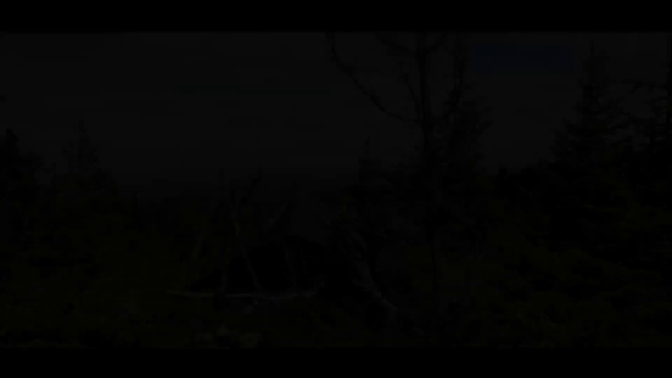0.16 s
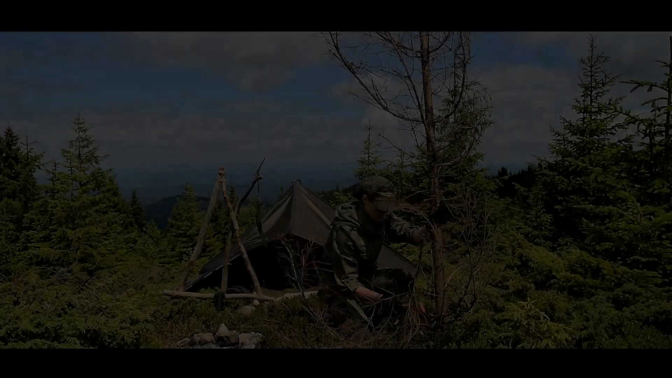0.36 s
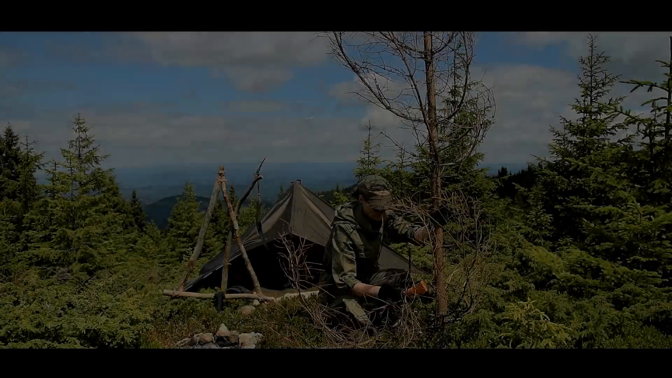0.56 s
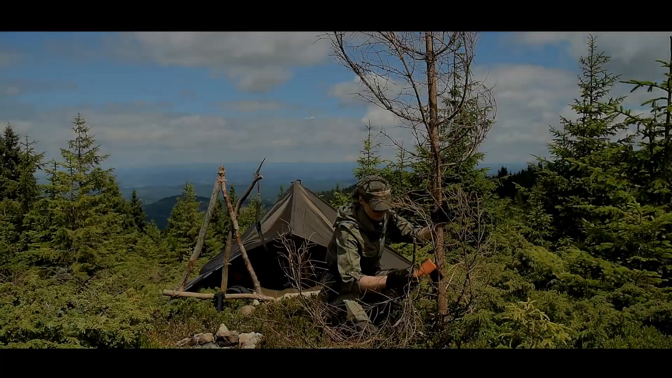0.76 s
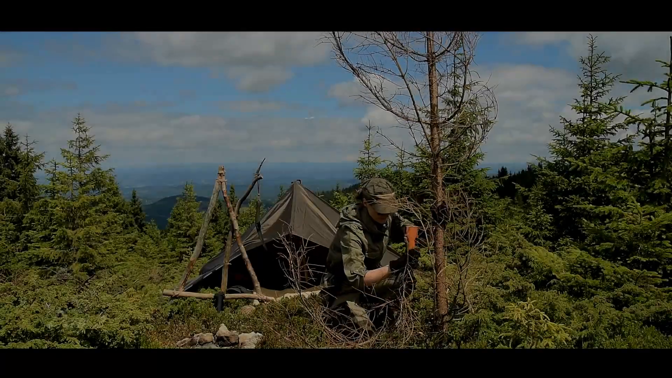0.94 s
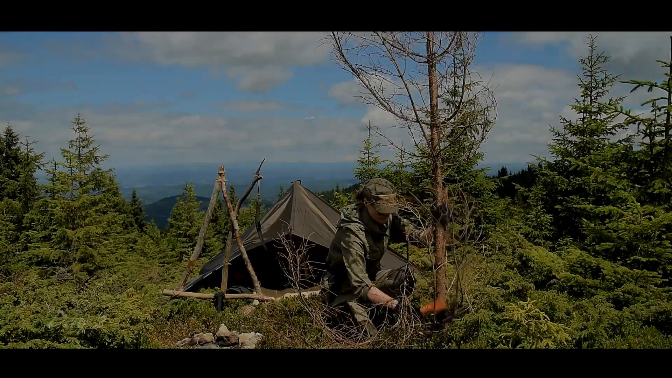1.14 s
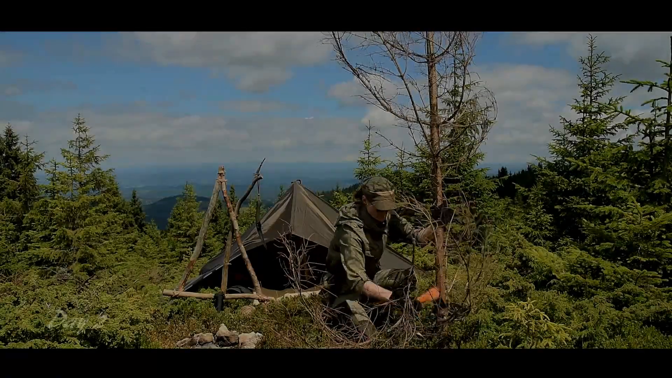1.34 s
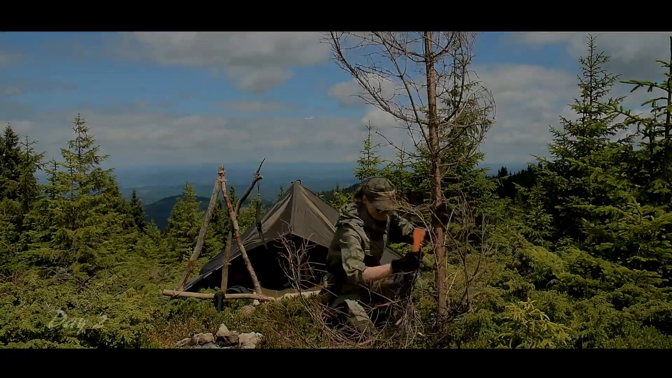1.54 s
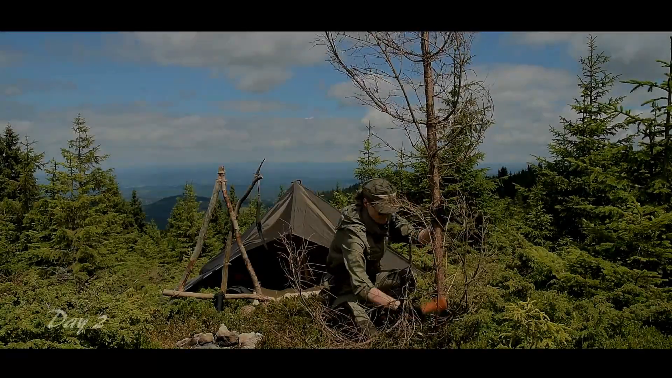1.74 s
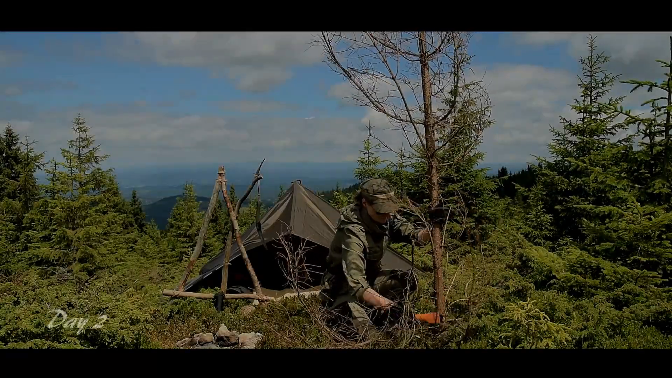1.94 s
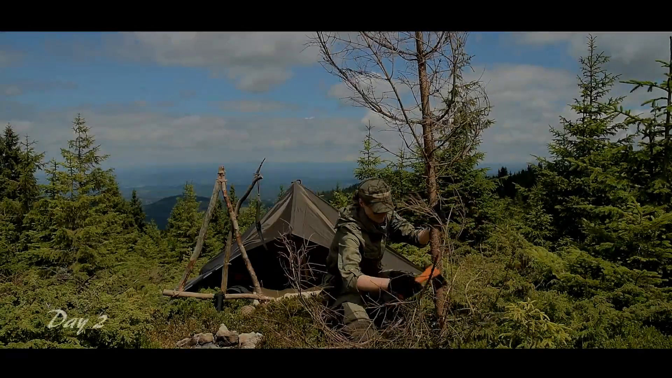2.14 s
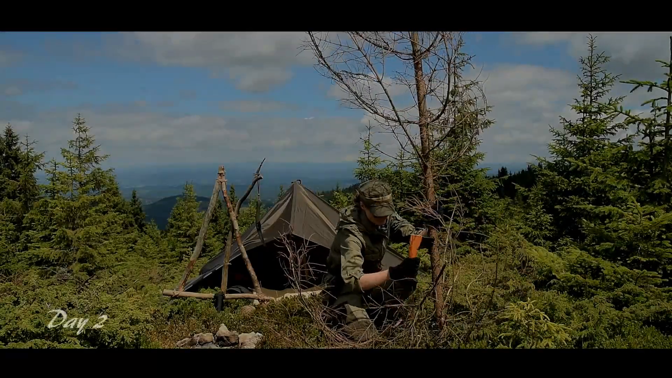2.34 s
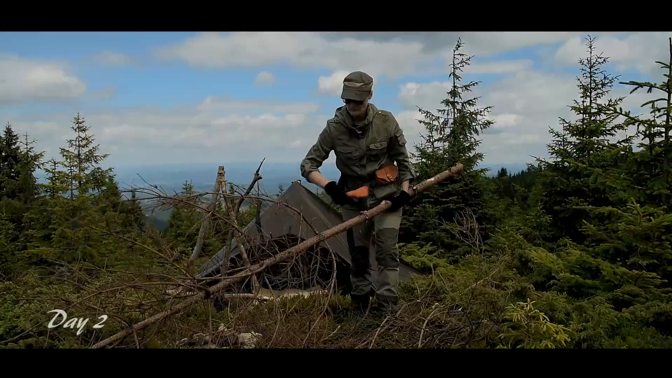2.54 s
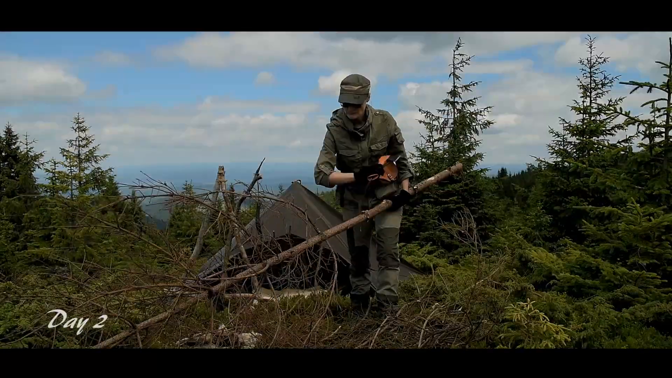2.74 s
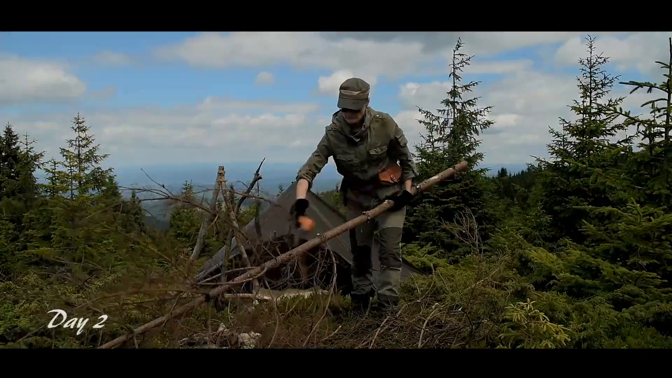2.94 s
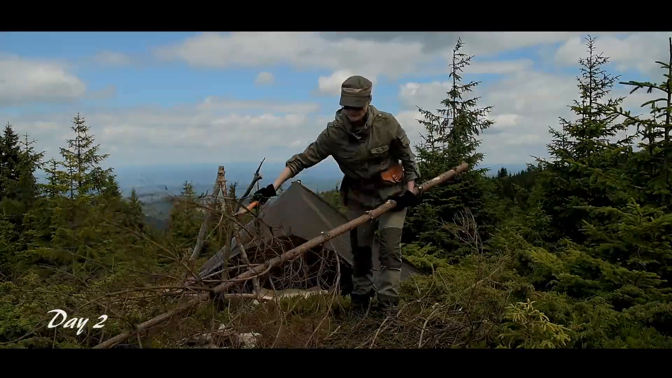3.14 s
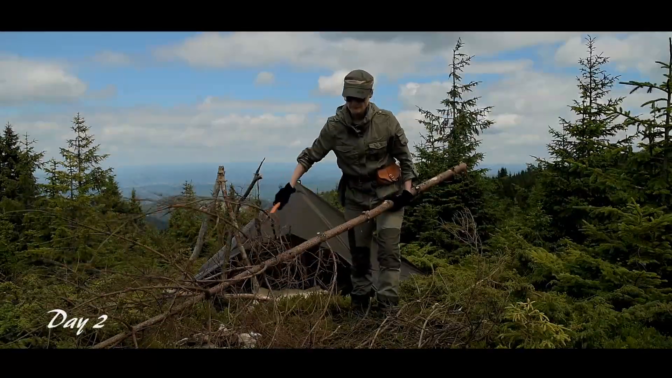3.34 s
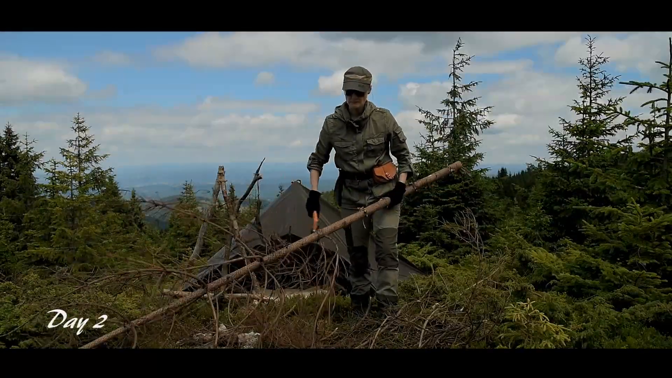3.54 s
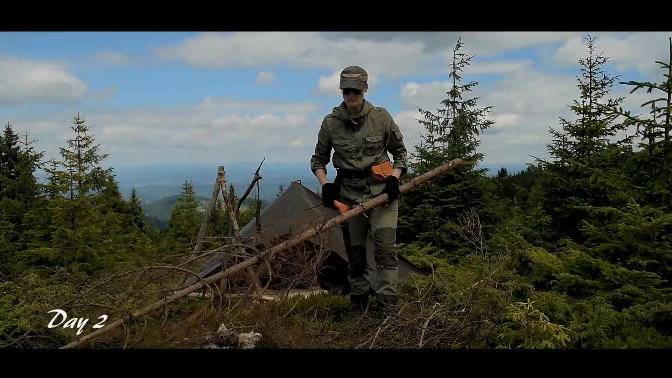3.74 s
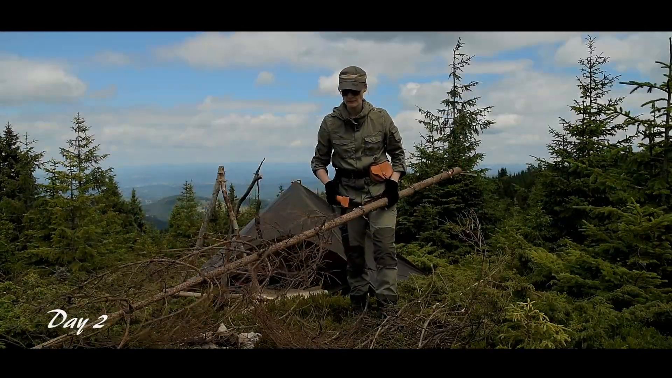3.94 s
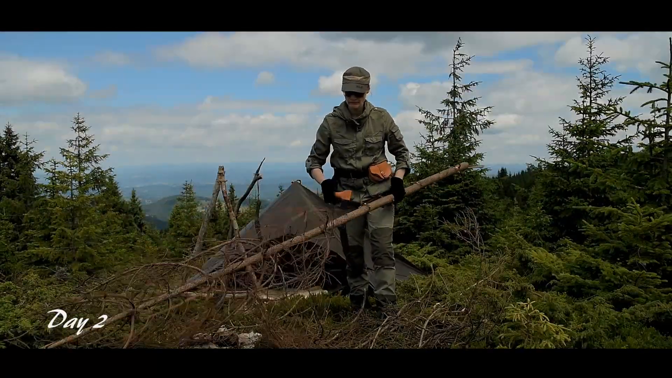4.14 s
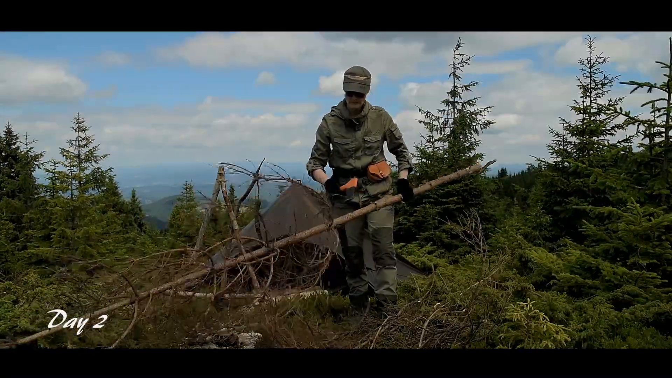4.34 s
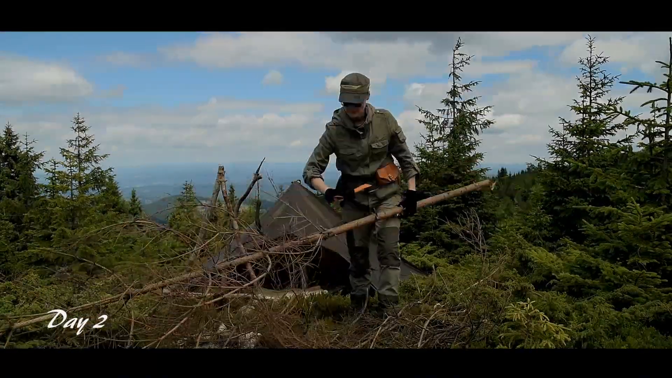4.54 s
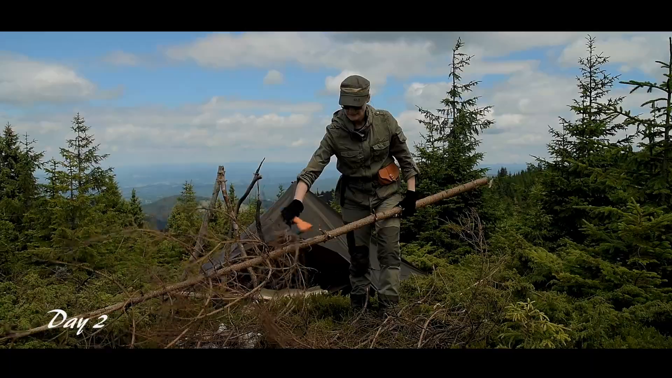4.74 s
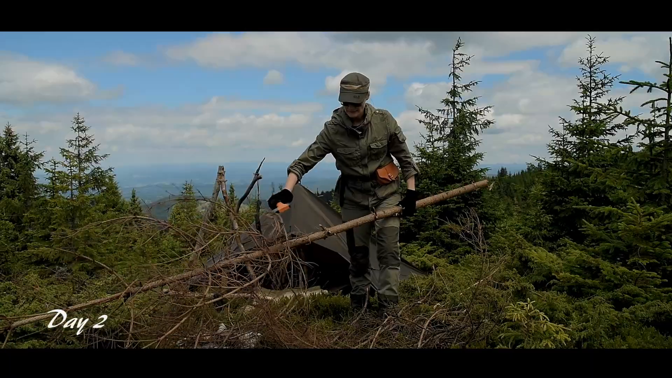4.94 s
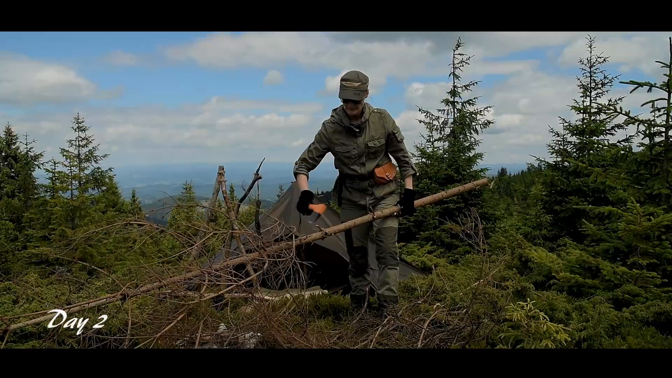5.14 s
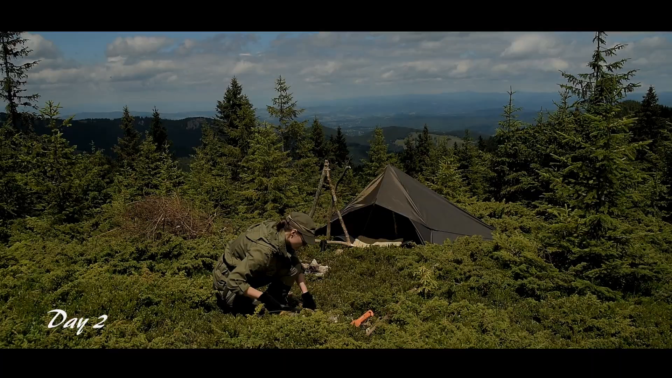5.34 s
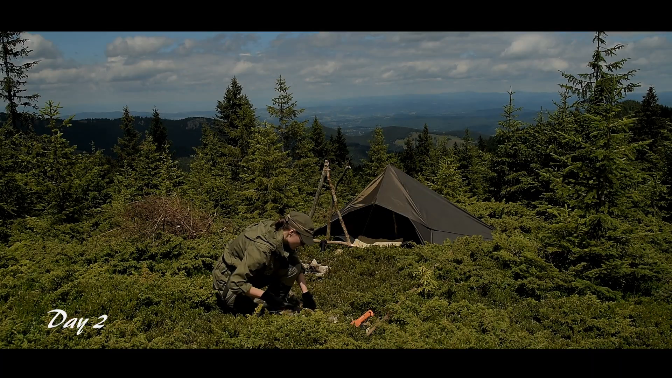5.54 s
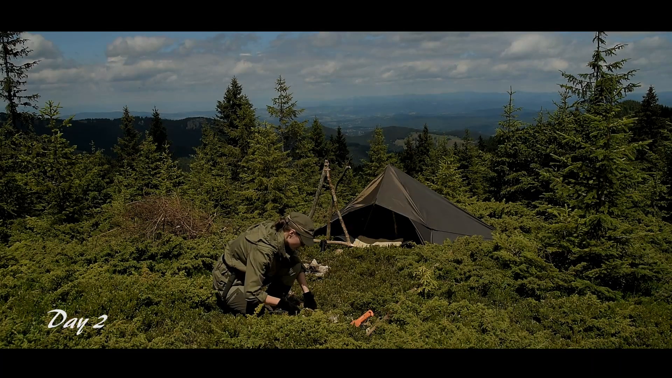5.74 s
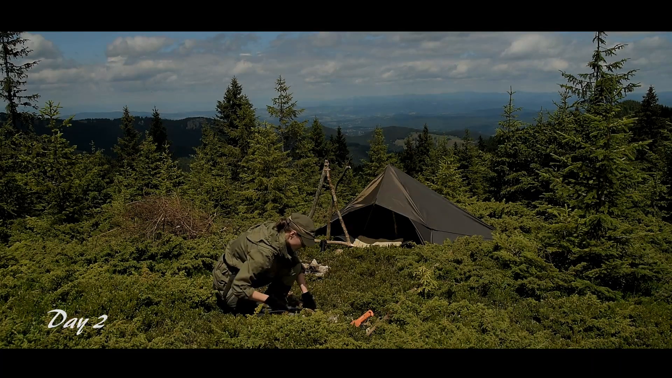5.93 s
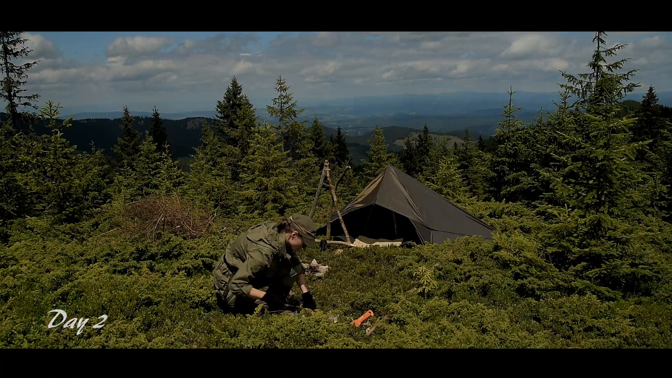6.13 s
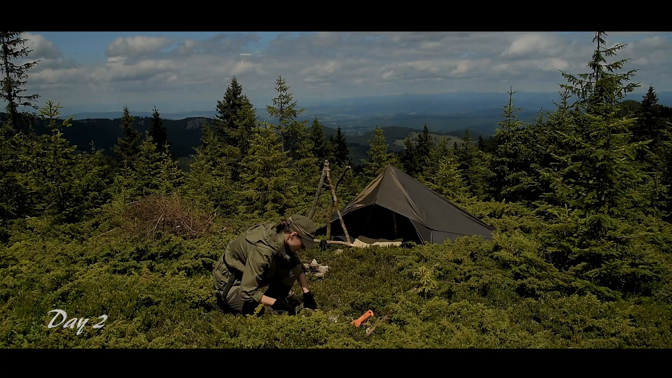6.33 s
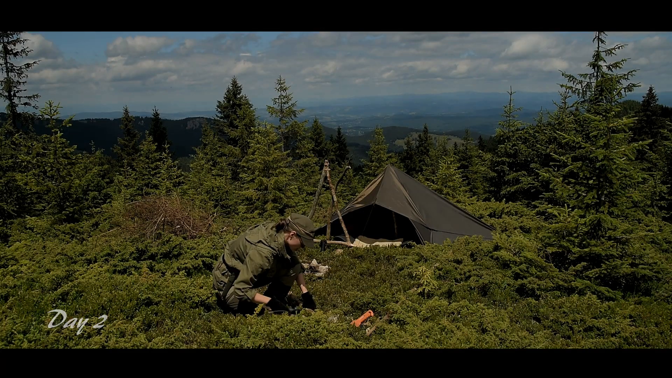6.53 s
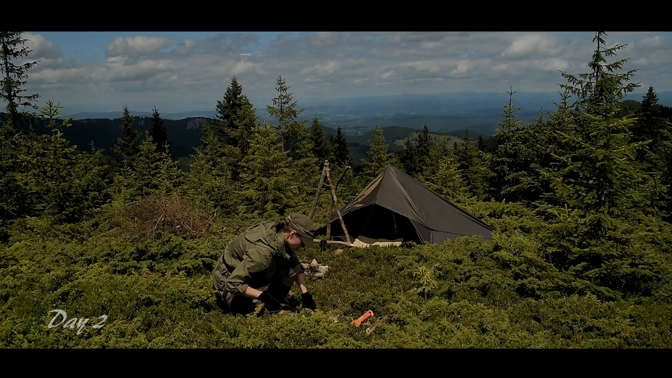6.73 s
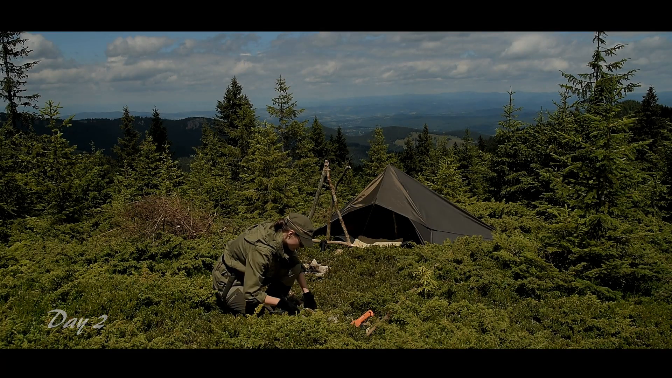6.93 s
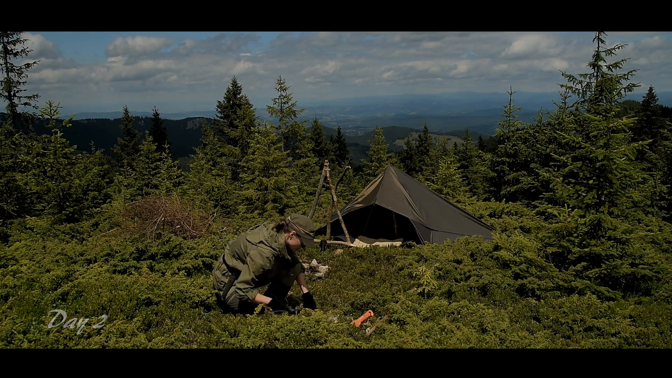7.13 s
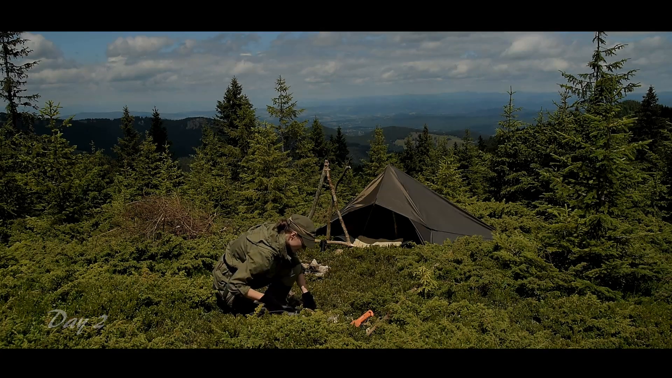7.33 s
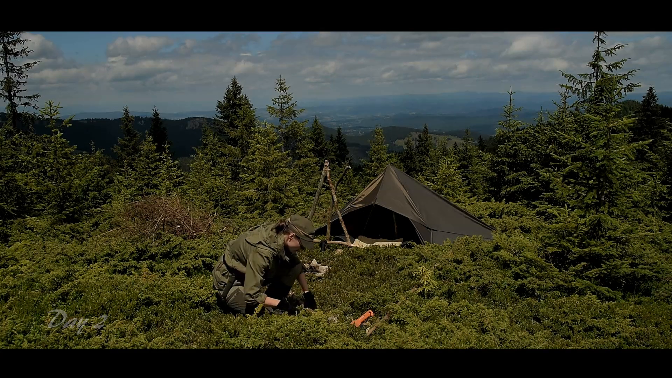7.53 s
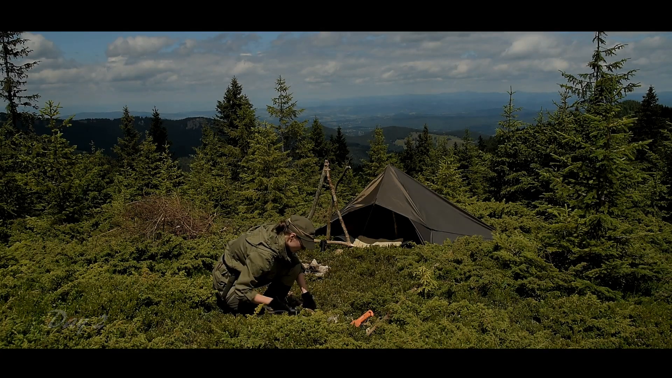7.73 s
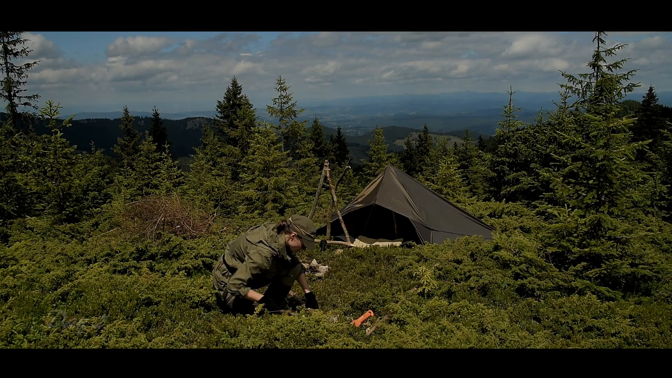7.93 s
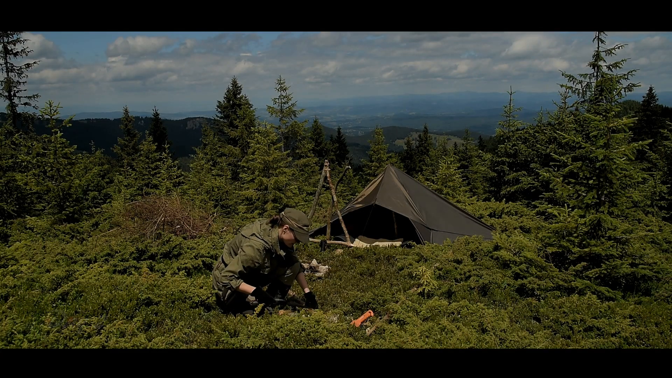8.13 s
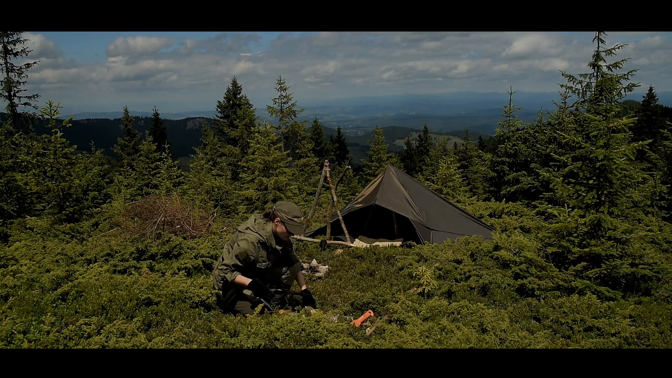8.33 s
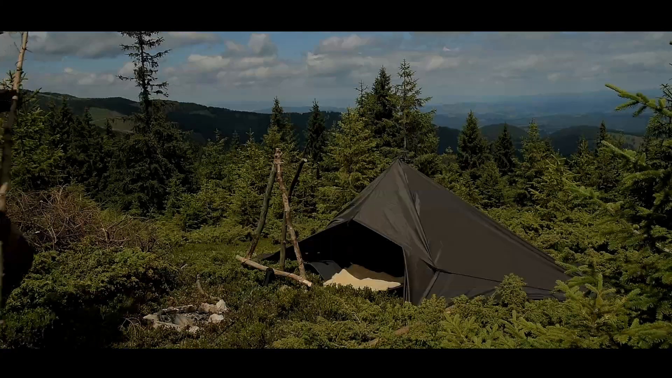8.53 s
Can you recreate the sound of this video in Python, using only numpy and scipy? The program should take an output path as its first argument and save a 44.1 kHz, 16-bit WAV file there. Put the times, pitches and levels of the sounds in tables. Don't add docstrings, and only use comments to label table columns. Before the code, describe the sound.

Dead branches are knocked off a dry spruce with harsh overloaded cracks and twig rustle, then a hand saw rasps quickly through a thin pole outdoors.

```python
import sys
import numpy as np
from scipy import signal
from scipy.fft import rfft, irfft, next_fast_len
from scipy.io import wavfile
from scipy.ndimage import uniform_filter1d

SR = 44100
rng = np.random.default_rng(int(sys.argv[2]) if len(sys.argv) > 2 else 0)


def inscribe(sig):
    pcm = np.round(np.clip(np.atleast_2d(sig).T, -1, 1) * 32767)
    wavfile.write(sys.argv[1], SR, pcm.astype(np.int16))


def voltage_ratio(decibels):
    exponent = np.asarray(decibels, float) / 20
    return 10 ** exponent


N = 382788

# frequency in Hz, level in dB per Hz.
AIR_COLOUR = [(59, -30), (100, -6.5), (279, 3), (471, -0.5), (694, 2), (1000, 0), (3470, -11),
              (6450, -21.5), (8460, -23.5), (9500, -24.5), (10300, -30), (13400, -45), (22000, -120)]
AIR_DB = -51
# frequency in Hz, likeness from 0 to 1.
AIR_LIKENESS = [(60, 0.84), (170, 0.84), (460, 0.77), (1280, 0.72), (3540, 0.12), (9820, 0.15)]
# time in seconds, level in dB.
WIND = [(0.0, -58), (0.39, -53.5), (0.6, -59.5), (1.67, -74), (1.91, -43.5), (2.08, -71), (2.47, -74),
        (2.78, -60), (3.6, -54.5), (4.25, -52.5), (4.57, -82), (4.83, -82), (6.94, -71), (7.64, -72),
        (8.34, -72), (8.68, -65)]

# frequency in Hz, level in dB per Hz.
TREE_TWIGS = [(88, -19), (150, -6), (182, -4), (426, -2), (545, 3.5), (724, -1.5), (1600, 0), (8160, -19.5),
              (10300, -27), (13400, -45), (22000, -120)]
POLE_TWIGS = [(88, -43), (150, -15.5), (674, 2), (805, 8), (1250, 6), (1660, 3), (2330, -0.5),
              (8610, -22.5), (9740, -28.5), (10300, -32), (13400, -48), (22000, -120)]
TENT_TWIGS = [(88, -68), (150, -37), (473, -9.5), (555, -5.5), (3820, -30.5), (5730, -26), (10300, -44.5),
              (13400, -51), (22000, -120)]
# time of the peak in seconds, build-up in seconds,
# peak in dB, settling time in seconds, brightness in dB.
TREE_SHAKES = [
    (.19, .12, -50, .01, -13.5),
    (.235, .01, -33, 0.16, -7.5),
    (.65, 0.08, -63.5, 1, -33),
    (.44, .015, -51, 0.022, -17),
    (1.255, .01, -31, 0.13, -6),
    (1.44, 0.014, -45, 0.023, -24),
    (1.925, 0.013, -36.5, 0.14, -6.5),
    (2.2, 0.045, -78, 0.72, 1),
]
POLE_SHAKES = [(2.484, .004, -47, 0.28, -15), (2.98, 0.04, -70, 0.011, -32), (3.045, .01, -32, 0.31, -8.5),
               (4.007, 0.0022, -51.5, 0.055, -4), (4.586, 0.0016, -39.5, 0.0082, -18),
               (4.62, 0.0088, -62.5, 0.11, -7), (4.75, 0.026, -46, .02, -16),
               (4.825, 0.014, -34, 0.28, -8.5), (5.23, 0.065, -68, 0.031, -3),
               (8.04, 0.0094, -38.5, 0.1, -6), (8.3, 0.078, -55.5, 0.82, -18)]
TENT_SHAKES = [
    (8.435, 0.0023, -48, 0.072, -6.5),
    (8.47, 0.031, -40.5, 0.43, -22.5),
]
STILL_S = (2.47, 5.33, 8.42)
# time in seconds, level in dB, brightness in dB.
DRAG = [(3.47, -62.5, -12.5), (3.55, -46, -9), (3.62, -40, -5.5), (3.78, -40, -5.5), (3.9, -42, -5.5),
        (4.08, -48, -17.5), (4.2, -41.5, -11), (4.37, -39.5, -8.5), (4.483, -45, -4.5), (4.539, -40, -17),
        (4.565, -70, 3)]

# frequency in Hz, level in dB per Hz.
SPLINTERS = [(59, -104), (100, -10), (765, 5), (1480, 3.5), (1980, 7), (2800, 1.5), (3820, -1), (5630, -6),
             (10300, -24), (13400, -58), (22000, -120)]
# time in seconds, ring peak in dB, ring frequency in Hz,
# time for the ring to fall 60 dB in seconds, splinter level in dB.
TREE_RUPTURES = [ (0.2092, 5, 1140, 0.0032, -12), (0.2121, 5, 3750, 0.0038, -0.5),
                 (0.2146, 0, 367, 0.011, -19.5), (.2160, -11, 523, 0.04, -28.5),
                 (0.234, -26, 2180, 0.0039, -15.5), (1.2332, -5.5, 1300, 0.006, -13),
                 (1.2345, -9, 800, .012, -40), (1.2357, 7, 1930, 0.0039, 2),
                 (1.238, -13.5, 242, 0.03, -25.5), (1.2428, -2.5, 1900, 0.005, -6),
                 (1.2375, -15.5, 425, 0.017, -55), (1.2457, -10, 430, 0.015, -24),
                 (1.244, -16.5, 3070, 0.022, -38), (1.862, -10, 1450, 0.023, -43),
                 (1.8654, 8.5, 1805, 0.0035, -3.5), (1.87, 0, 1830, 0.0051, -6.5),
                 (1.8686, -3.5, 270, 0.0083, -18.5), (1.877, -43, 2480, 0.0072, -15.5),
                 (1.8893, -8.5, 400, 0.011, -13.5), (1.9030, -14.5, 625, 0.038, -10),
                 (1.9082, -2.5, 630, 0.0063, -37.5), (1.9109, -0.5, 267.4, 0.011, -10.5)]
POLE_RUPTURES = [ (3.012, -18, 2820, 0.0042, 10.5), (3.0123, -4.5, 1257, 0.02, -23),
                 (3.0147, -1.5, 802, 0.03, 5.5), (3.0190, -6, 1054, 0.03, -29),
                 (3.0300, -19.5, 864, 0.02, -36), (3.0130, -5.5, 664, 0.044, -33),
                 (3.0135, -19.5, 295, 0.051, -31.5), (4.7773, 1, 1150, 0.0067, -1),
                 (4.7818, 8, 920, 0.012, -2.5), (4.7858, 5.5, 907, 0.01, -4),
                 (4.7862, -12.5, 2600, 0.011, -6), (4.7870, -10, 790, 0.06, -38),
                 (4.7879, 0, 960, .012, -30), (4.781, -8, 330, .02, -40), (4.8, -18, 830, .02, -45),
                 (4.7922, -12.5, 860, 0.03, -44), (4.7839, -5.5, 1500, 0.011, -29)]
SAWN_RUPTURES = [
    (7.8815, -15, 694, 0.0071, -40),
    (7.8795, -19, 1500, .003, -25),
    (7.9263, -14, 4200, 0.0018, -23),
    (7.9335, -19, 4100, 0.003, -23),
    (7.9357, -18, 4430, 0.0034, -31),
    (7.936, -27, 3720, 0.0046, -31),
]
# time in seconds, peak in dB, ring in Hz.
BITES = [(5.447, -27, 1140), (5.465, -24, 875), (5.638, -24, 506), (5.732, -25, 791), (5.753, -23, 1130),
         (5.858, -28, 490), (5.902, -20, 773), (6.019, -24, 821), (6.039, -22, 824), (6.156, -23, 974),
         (6.179, -18, 950), (6.196, -18, 958), (6.304, -29, 805), (6.329, -21, 762), (6.513, -22, 958),
         (6.62, -19, 657), (6.739, -28, 641), (6.787, -19, 950), (6.806, -17, 934), (6.891, -27, 657),
         (6.905, -22, 993), (7.064, -23, 466), (7.111, -25, 525), (7.235, -18, 458), (7.377, -20, 953),
         (7.407, -22, 530), (7.518, -24, 778), (7.531, -18, 746), (7.67, -24, 694), (7.714, -21, 541),
         (7.79, -26, 988), (7.805, -19, 1040), (7.824, -19, 584), (7.878, -15, 571)]
# start in seconds, end in seconds, level in dB.
BLOW_HISS = [
    (0.19, 0.241, -25),
    (1.215, 1.26, -32),
    (1.831, 1.895, -34.5),
    (1.858, 1.919, -30.5),
    (2.983, 3.045, -31),
    (4.742, 4.82, -33),
]
# frequency in Hz, level in dB per Hz.
BLOW_HISS_COLOUR = [(150, 0.5), (600, 6.5), (3000, 1.5), (9300, -2), (12000, -8), (13000, -60)]

# middle in seconds, length in seconds, level in dB, centre in Hz, width ratio.
HIGH_GLINTS = [(.22, .065, -57, 11800, 1.015), (.235, .045, -64, 11200, 1.015),
               (.235, .045, -63, 10650, 1.015), (1.235, .045, -58, 10100, 1.02),
               (1.32, .05, -74, 11800, 1.01), (1.85, .04, -60, 11100, 1.025),
               (1.88, .05, -62, 10200, 1.015), (3.02, .06, -60, 10800, 1.025),
               (3.55, .04, -76, 11200, 1.01), (4.77, .04, -66, 10100, 1.015), (5.44, .03, -75, 11300, 1.04),
               (6.38, .04, -76, 10800, 1.01), (7.51, .04, -74, 11300, 1.01),
               (7.995, .045, -70, 12000, 1.04), (7.995, .045, -73, 10800, 1.01)]
TWIG_SURGES = [(.255, .015, -33, 1500, 1.8), (.322, .02, -37, 1000, 1.4), (.35, .012, -42, 3500, 1.15),
               (1.276, .02, -32, 1600, 1.2), (1.39, .06, -46, 1600, 1.2), (1.452, .04, -43, 1600, 1.25),
               (2.027, .03, -44, 1240, 1.4), (3.085, .03, -38, 1800, 1.6), (3.58, .04, -46, 900, 1.2),
               (3.635, .06, -40, 1900, 1.4), (3.69, .04, -45, 1100, 1.4), (3.74, .03, -45, 1100, 1.4),
               (3.82, .05, -44, 1100, 1.3), (3.87, .03, -45, 900, 1.2), (4.012, .03, -45, 1100, 1.4),
               (4.142, .025, -46, 1500, 1.15), (4.215, .05, -43, 1100, 1.2), (4.295, .05, -46, 1300, 1.2),
               (4.37, .07, -40.5, 1100, 1.25), (4.535, .04, -45, 750, 1.2), (8.445, .03, -48, 3000, 2.0)]
SAW_SURGES = [(5.93, .07, -41, 2900, 1.25), (5.77, .1, -39, 850, 1.2), (5.655, .04, -41, 550, 1.2),
              (6.04, .09, -39, 900, 1.2), (6.06, .03, -46, 3900, 1.1), (7.55, .07, -45, 5000, 1.25),
              (7.68, .07, -44, 3400, 1.15), (7.84, .07, -45, 4500, 1.3), (5.5, .08, -42, 280, 1.25),
              (6.81, .05, -41, 330, 1.25), (6.2, .05, -38, 950, 1.2), (6.515, .03, -38, 950, 1.2),
              (6.515, .05, -43, 1700, 1.1), (6.65, .09, -34.5, 650, 1.15), (6.65, .09, -42, 1700, 1.15),
              (6.805, .06, -35, 950, 1.2), (6.95, .11, -34, 620, 1.15), (6.94, .09, -42, 1700, 1.15),
              (7.115, .03, -37, 550, 1.2), (7.11, .08, -45, 3000, 1.3), (7.25, .07, -35, 650, 1.4),
              (7.41, .03, -37, 550, 1.2), (7.555, .08, -31.5, 620, 1.3), (7.72, .05, -39, 540, 1.2),
              (7.83, .06, -36, 750, 1.2)]
# time in seconds, peak in dB, centre in Hz,
# width ratio.
TICKS = [(0.394, -28.5, 5500, 1.24), (.425, -26, 1300, 1.1), (0.458, -25.5, 2200, 1.3),
         (0.585, -28.5, 2400, 1.3), (0.757, -31, 3500, 1.12), (1.281, -16.5, 3050, 1.9),
         (1.445, -29, 1500, 1.4), (1.637, -34, 2800, 1.24), (1.8098, -31, 4000, 1.7),
         (2.06, -34, 5000, 1.8), (2.357, -32, 3600, 1.2), (2.486, -31, 2200, 1.4), (2.549, -30, 2500, 1.9),
         (2.62, -35, 3000, 1.4), (4.005, -32, 1800, 1.9), (4.189, -27, 3300, 0.75),
         (4.5852, -16, 2200, 1.57), (4.75, -47.5, 1690, 2), (5.353, -26, 2000, 2), (5.64, -25, 2000, 1.7),
         (5.859, -23, 2500, 1.7), (6.739, -27, 2700, 1.6), (6.786, -16, 1700, 1.3), (6.158, -31, 1500, 2.0),
         (7.236, -36, 1200, 2.0), (7.379, -27.5, 2000, 2.0), (7.532, -20, 1190, 2.0),
         (7.8790, -20, 3400, 1.3), (8.031, -22.5, 2400, 1.5), (8.158, -38.5, 3500, 1.6)]
# time in seconds, level in dB, pitch sweep in Hz.
TRILL = [
    (1.64, -60, 180),
    (1.68, -50, 230),
    (1.74, -47.5, 400),
    (1.78, -49, 400),
    (1.805, -58, 400),
]

# turn in seconds, fastest moment in seconds,
# peak in dB, main pole resonance in Hz, rasp level in dB.
STROKES = [(5.352, 5.333, -28, 720, -0.5), (5.396, 5.509, -35, 835, -6), (5.564, 5.669, -39.5, 1010, -6.5),
           (5.684, 5.787, -33, 950, -6.5), (5.838, 5.937, -32.5, 997, -2.5), (5.977, 6.073, -32, 793, -8),
           (6.13, 6.198, -32, 955, -3.5), (6.276, 6.355, -34, 793, -7), (6.416, 6.519, -39, 946, -1.5),
           (6.563, 6.65, -34, 645, -6), (6.712, 6.80, -36, 950, -3), (6.852, 6.95, -33, 805, -7.5),
           (7.016, 7.09, -38.5, 795, -1), (7.164, 7.255, -34, 1026, -8), (7.317, 7.39, -36, 870, -3),
           (7.464, 7.573, -31, 748, -9), (7.607, 7.725, -35, 785, -6.5), (7.762, 7.856, -30, 796, -10),
           (7.928, 7.962, -35.5, 800, -2), (7.951, 7.994, -32.5, 825, -10.5)]
# frequency in Hz, level in dB per Hz.
SAWN_COLOUR = [(47, -51), (80, -11), (123, -16.5), (459, -3.5), (973, -5), (1430, -8.5), (1680, -5.5),
               (3290, -6.5), (8380, -20.5), (10300, -30), (13400, -45), (22000, -120)]
# frequency in Hz, width in Hz, level in dB.
BLADE_RINGS = [
    (1730, 480, -0.5),
    (2620, 134, 0.5),
]


def unit(x):
    return x / np.sqrt(np.mean(x ** 2) + 1e-20)


def at_hz(points, hz):
    known_hz, level = np.array(points).T
    return np.interp(np.log(np.maximum(hz, 1)), np.log(known_hz), level)


def colour(x, points):
    level = np.log(voltage_ratio(at_hz(points, np.fft.rfftfreq(4096, 1 / SR))))
    fold = irfft(level)[:2049] * np.r_[1, np.full(2047, 2), 1]
    response = irfft(np.exp(rfft(fold, 4096)))
    return unit(signal.fftconvolve(x, response)[:len(x)])


def drift(rate_hz):
    r = np.exp(-2 * np.pi * rate_hz / SR)
    wander = signal.lfilter([1], [1, -2 * r, r * r], rng.standard_normal(N + SR))
    return unit(wander[SR:])


def air():
    size = next_fast_len(N)
    mid, side = (rfft(colour(rng.standard_normal(N), AIR_COLOUR) * voltage_ratio(1.9 * drift(5.3)), size)
                 for k in range(2))
    alike = np.clip(at_hz(AIR_LIKENESS, np.fft.rfftfreq(size, 1 / SR)), 0, 1)
    both = np.sqrt(1 + alike) * mid + np.sqrt(1 - alike) * side * [[1], [-1]]
    return voltage_ratio(AIR_DB - 3) * irfft(both, size)[:, :N]


def played(tables, ramp, rest_db):
    rows = []
    for t in tables:
        rows += [(t[0][0] - ramp, rest_db, *t[0][2:]), *t, (t[-1][0] + ramp, rest_db, *t[-1][2:])]
    s, level_db, *columns = np.transpose(rows)
    s = np.maximum.accumulate(s)
    gain, *columns = [np.interp(np.arange(N) / SR, s, c) for c in (voltage_ratio(level_db / 2), *columns)]
    return [gain ** 2, *columns]


def evened(x, over_s):
    span = int(over_s * SR)
    power = uniform_filter1d(uniform_filter1d(x ** 2, span), span)
    return x / np.sqrt(power + 1e-9)


def wind():
    gain, = played([WIND], ramp=.1, rest_db=-70)
    deep = signal.butter(2, [15, 60], "band", fs=SR, output="sos")
    rumble = signal.sosfilt(deep, rng.standard_normal((2, N)))
    gusts = voltage_ratio(2.0 * drift(8))
    return gain * gusts * (evened(rumble[0], .25) + 0.092 * unit(rumble[1]) * [[1], [-1]])


def split(x, hz):
    filters = [signal.butter(4, hz, kind, fs=SR, output="sos") for kind in ("low", "high")]
    return [unit(signal.sosfilt(f, x)) for f in filters]


def grains(per_s, spread_db, cycles, ring_s, patchy_db, patch_s):
    at = np.flatnonzero(rng.random(N) < per_s / SR)
    sizes = (voltage_ratio(spread_db * np.minimum(rng.exponential(1, N), 4)) * rng.choice([-1, 1], N))[at]
    dealt = (28 * rng.random(N)[at] ** .6).astype(int)
    patches = rng.standard_normal((28, 2000))
    out = 0
    for k, hz in enumerate(np.geomspace(140, 10000, 28)):
        r, w = voltage_ratio(-60 / ((cycles / hz + ring_s) * SR)), 2 * np.pi * hz / SR
        mine = dealt == k
        patch = np.interp(at[mine] / SR / patch_s, np.arange(2000), patches[k])
        struck = np.full(N, 1e-18)
        struck[at[mine]] = sizes[mine] * voltage_ratio(patchy_db * patch)
        ring = signal.lfilter([1, 0, -1], [1, -2 * r * np.cos(w), r * r], struck)
        out = out + np.sqrt(hz) * unit(ring)
    return out


def shaken(rows):
    t, low, high = np.arange(0, N / SR, .001), 0, 0
    for s, build_s, db, settle_s, bright_db in rows:
        until = min([e for e in STILL_S if e > s] + [N / SR])
        build = np.exp(np.minimum(t - s, 0) / build_s)
        settle = (1 + np.maximum(t - s, 0) / settle_s) ** 2.78
        gain = voltage_ratio(db) * build * (t < until) / settle
        low, high = low + gain, high + gain * voltage_ratio(bright_db)
    return [np.interp(np.arange(N) / SR, t, gain) for gain in (low, high)]


CLUMP_DB = 1.2


def twigs():
    rub = grains(9000 * voltage_ratio(2.5 * drift(20)), spread_db=1.7, cycles=7.0, ring_s=0.002,
                 patchy_db=3.4, patch_s=.035)
    rub = rub * voltage_ratio(CLUMP_DB * drift(30))
    drag, drag_bright_db = played([DRAG], ramp=0.026, rest_db=-110)
    out = 0
    for rows, spectrum, dragged in ((TREE_SHAKES, TREE_TWIGS, 0), (POLE_SHAKES, POLE_TWIGS, drag),
                                    (TENT_SHAKES, TENT_TWIGS, 0)):
        dull, bright = shaken(rows)
        low, high = (evened(x, .05) for x in split(colour(rub, spectrum), 3520))
        out = out + (dull + dragged) * low + (bright + dragged * voltage_ratio(drag_bright_db)) * high
    return out


def burst(hz, t60):
    t = np.arange(4000) / SR
    return voltage_ratio(-60 * t / t60) * (1 - np.exp(-t * hz * 5.4)) ** 2 * np.sin(2 * np.pi * hz * t)


def add(out, s, sound, pan_db):
    i, pan_db = round(s * SR), np.clip(pan_db, -1.6, .4)
    out[:, i:i + len(sound)] += (sound * voltage_ratio([[pan_db / 2], [-pan_db / 2]]))[:, :N - i]


def cracks():
    out, spray = np.zeros((2, N)), colour(rng.standard_normal(N), SPLINTERS)
    bite_db, bite_t60_s, bite_splinter_db = -5.5, .012, -13
    bites = [(s, db + bite_db, hz, bite_t60_s, db + bite_splinter_db) for s, db, hz in BITES]
    t = np.arange(4000) / SR
    fall = voltage_ratio(-60 * t / .014) * (1 - np.exp(-t / 0.0011))
    for s, ring_db, hz, t60, splinter_db in TREE_RUPTURES + POLE_RUPTURES + SAWN_RUPTURES + bites:
        i = round(s * SR)
        ring = -voltage_ratio(ring_db + 5.5) * burst(hz, t60)
        splinters = voltage_ratio(splinter_db - 3) * fall * spray[i:i + 4000]
        add(out, s, ring + splinters, -3.2 - 1.4 * np.log2(hz / 1000))
    return out


def scrub(x):
    t60_s, echo_db = 0.12, -22.5
    t = np.arange(SR // 2) / SR
    mid, side = rng.standard_normal((2, SR // 2)) * voltage_ratio(-60 * t / t60_s) * (t > .004)
    dull = signal.butter(1, [300, 3500], "band", fs=SR, output="sos")
    tail = signal.sosfilt(dull, mid + .5 * side * [[1], [-1]])
    tail = tail / np.sqrt(np.sum(tail[0] ** 2))
    return voltage_ratio(echo_db) * signal.fftconvolve(x[None], tail, axes=1)[:, :N]


def blow_hiss():
    t = np.arange(N) / SR
    mid, side = (colour(rng.standard_normal(N), BLOW_HISS_COLOUR) for k in range(2))
    window = 0
    for start, end, db in BLOW_HISS:
        along = np.clip((t - start) / (end - start), 0, 1)
        window = window + voltage_ratio(db) * np.sin(np.pi * along) ** 0.88 * (t < end)
    return window * (mid + .3 * side * [[1], [-1]])


def surges(rows):
    out = np.zeros((2, N))
    for s, length, db, hz, width in rows:
        chance, grit = rng.standard_normal((2, 8000))
        width = max(width, 1.005)
        band = signal.butter(2, [hz / width, hz * width], "band", fs=SR, output="sos")
        noise = unit(signal.sosfilt(band, chance * voltage_ratio(4 * grit))[2000:])
        along = np.clip(np.arange(6000) / SR / length, 0, 1)
        add(out, s - length / 2, voltage_ratio(db) * np.sin(np.pi * along) * noise, -.4)
    return out


def ticks():
    out, t = np.zeros((2, N)), np.arange(600) / SR
    for s, peak_db, hz, width in TICKS:
        width = max(width, 1.1)
        band = np.clip([hz / width, hz * width], 100, 12000)
        snap = rng.standard_normal(600) * voltage_ratio(-60 * t / 0.013)
        click = signal.lfilter(*signal.butter(2, band, "band", fs=SR), snap)
        add(out, s, voltage_ratio(peak_db - 9.0) * click / np.abs(click).max(), -.4)
    return out


def bird():
    trill_hz, trills_per_s, first_s = 3430, 51.3, 1.6525
    gain, sweep = played([TRILL], ramp=.01, rest_db=-110)
    turn = (np.arange(N) / SR - first_s) * trills_per_s % 1
    hz = trill_hz + sweep * np.interp(turn, [0, .25, 1], [-1, 1, -1])
    whistle = np.sin(2 * np.pi * np.cumsum(hz) / SR)
    pulse = np.interp(turn, [0, .2, .5, 1], [.4, .6, 0.62, 0.45])
    return gain * voltage_ratio(3.5 * drift(90)) * whistle * pulse


def blade():
    saw_stops_s = 8.02
    rise_power, fall_power = 1.82, 2.08
    turn, fastest, peak_db, hz, rasp_db = np.transpose(STROKES)
    marks = np.r_[np.c_[turn, fastest].ravel(), saw_stops_s]
    phase = np.interp(np.arange(N) / SR, marks, np.arange(len(marks)) / 2)
    k = np.minimum(phase.astype(int), len(turn) - 1)
    along = phase - k - .5
    speed = np.abs(np.cos(np.pi * along))
    gain = voltage_ratio(peak_db[k]) * speed ** np.where(along < 0, rise_power, fall_power) + voltage_ratio(-57)
    body_hz = hz[k] * (1 - 0.16 * along)
    hiss_db = -13.5 + 0.32 * (rasp_db[k] - rasp_db.mean()) - 2.5 * along + 2 * np.abs(2 * along)
    return gain, body_hz, rasp_db[k] - 0.5 * along, hiss_db


def steel(x):
    rings = sum(voltage_ratio(db) * signal.lfilter(*signal.iirpeak(hz, hz / width, fs=SR), x)
                for hz, width, db in BLADE_RINGS)
    return unit(x) + voltage_ratio(-10) * unit(rings)


def following(x, hz):
    width_hz = 81
    turn = np.exp(2j * np.pi * np.cumsum(hz) / SR)
    narrow = signal.butter(1, width_hz / 2, fs=SR, output="sos")
    return unit(np.real(signal.sosfilt(narrow, x / turn) * turn))


def saw():
    t = np.arange(N) / SR
    gain, body_hz, rasp_db, hiss_db = blade()
    sawing = np.interp(t, [5.33, 5.34, 8.03, 8.05], [0, 1, 1, 0])
    fibres = grains(9000, spread_db=3.5, cycles=9.0, ring_s=.003, patchy_db=4.5, patch_s=.04)
    low, upper = split(colour(fibres, SAWN_COLOUR), 1400)
    rasp, hiss = (evened(x, 0.029) for x in split(steel(upper), 3000))
    dust = split(colour(rng.standard_normal(N), SAWN_COLOUR), 3600)[1]
    hiss = unit(hiss + dust)
    lower_hz = (430 + 50 * (t - STROKES[0][0])) * (1 + 0.097 * drift(13))
    body = evened(low + 0.35 * following(low, body_hz) + 0.15 * following(low, lower_hz), 0.029)
    clumps = voltage_ratio(CLUMP_DB * drift(51))
    return sawing * gain * clumps * (body + voltage_ratio(rasp_db) * rasp + voltage_ratio(hiss_db) * hiss)


def scene():
    blows = cracks()
    small = ticks() + (twigs() + saw()) * voltage_ratio([[-.2], [.2]])
    no_bass = signal.butter(2, 110, "high", fs=SR, output="sos")
    near = signal.sosfilt(no_bass, blows + small)
    echo = scrub((voltage_ratio(-5) * blows + small).mean(axis=0))
    hillside = air() + voltage_ratio(5.5) * wind() + bird() * voltage_ratio([[.5], [-.5]])
    return near + echo + hillside + surges(SAW_SURGES + TWIG_SURGES)


def low_pass(x):
    return signal.sosfilt(signal.butter(12, 12500, fs=SR, output="sos"), x)


def record(dry):
    low_cut_hz, top_hz = 86, 9800
    flat = dry / (1 + np.abs(dry / 0.82) ** 5.95) ** (1 / 8.1)
    low_cut = signal.butter(2, low_cut_hz, "high", fs=SR, output="sos")
    passed = signal.sosfilt(low_cut, flat) + blow_hiss()
    top_cut = signal.ellip(8, .03, 40, top_hz, fs=SR, output="sos")
    passed = signal.sosfiltfilt(top_cut, passed)
    return low_pass(passed + surges(HIGH_GLINTS))


dry = scene()
out = record(dry)
inscribe(out)
```